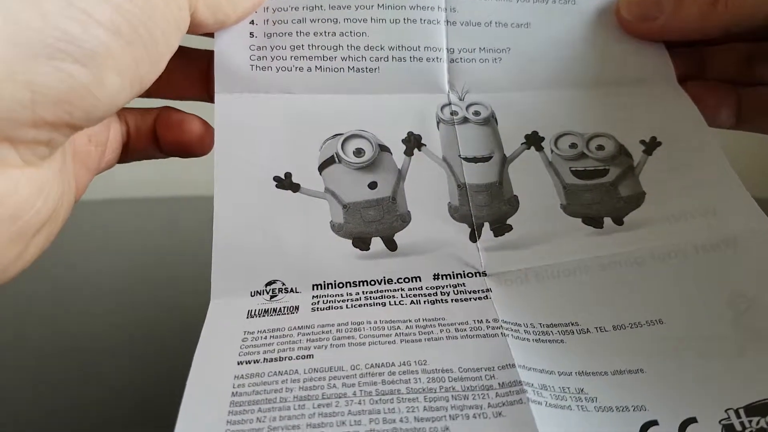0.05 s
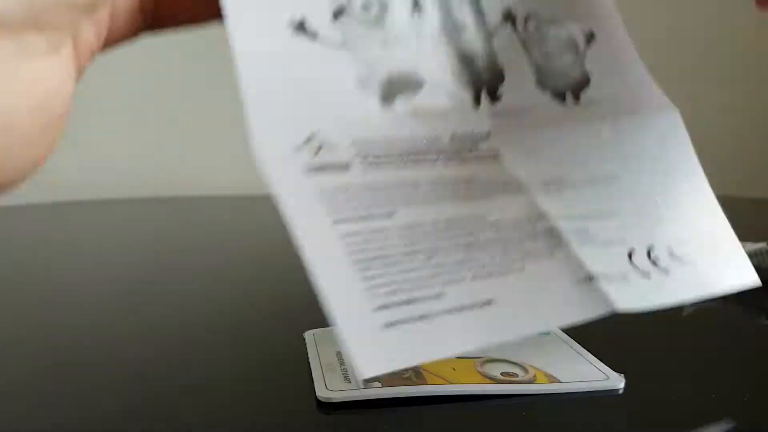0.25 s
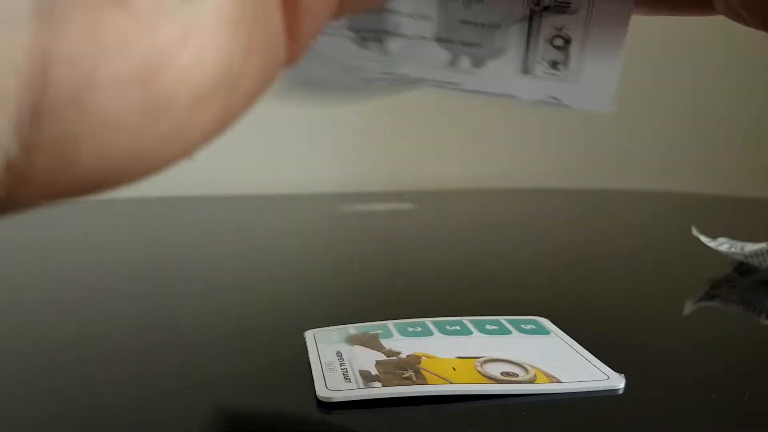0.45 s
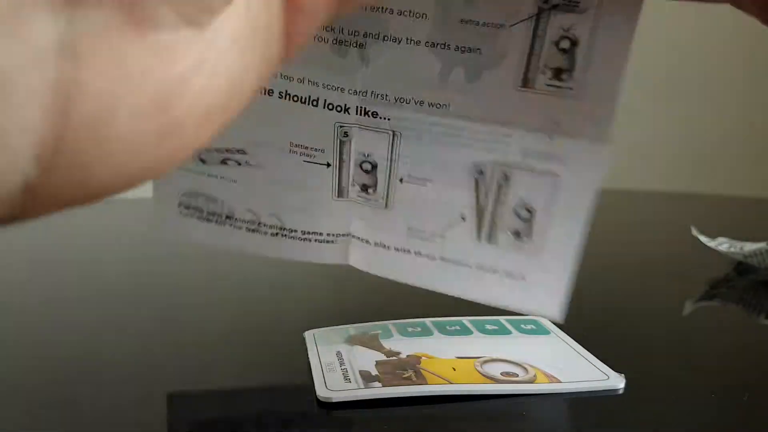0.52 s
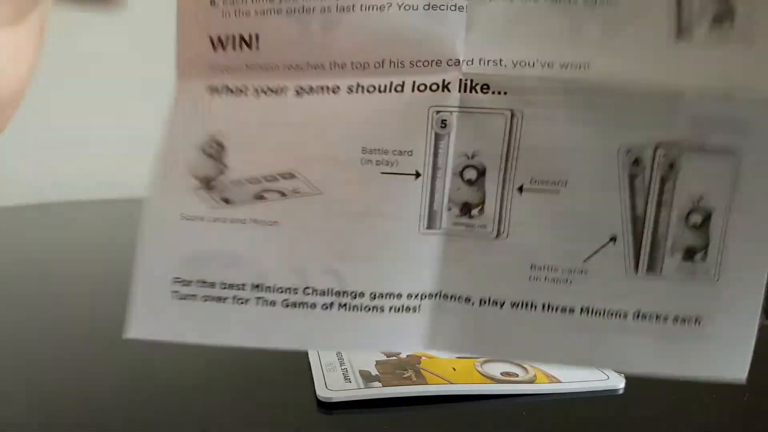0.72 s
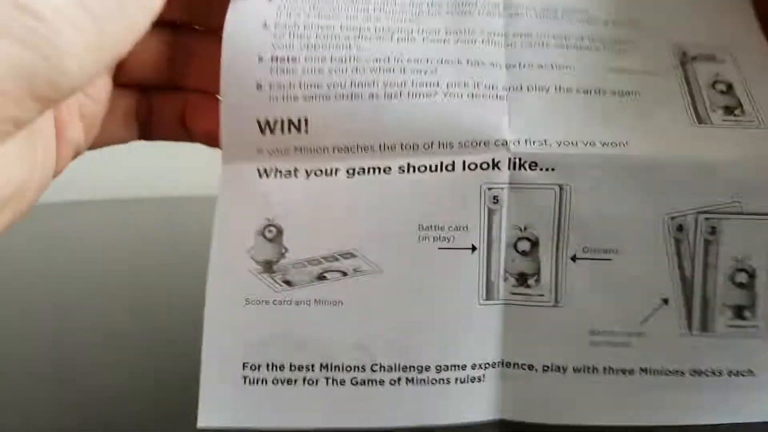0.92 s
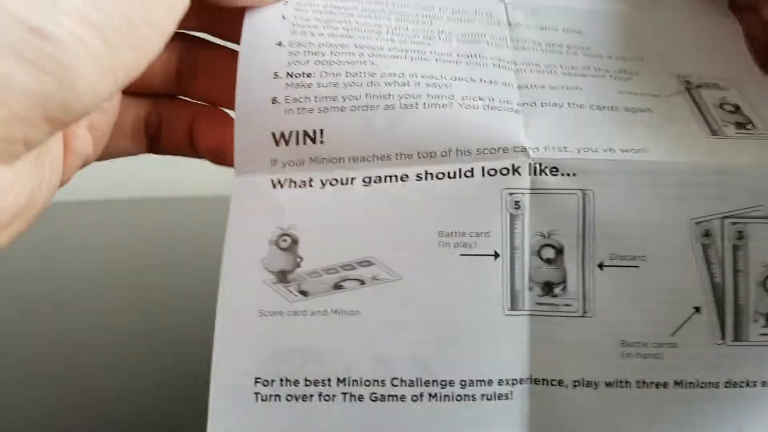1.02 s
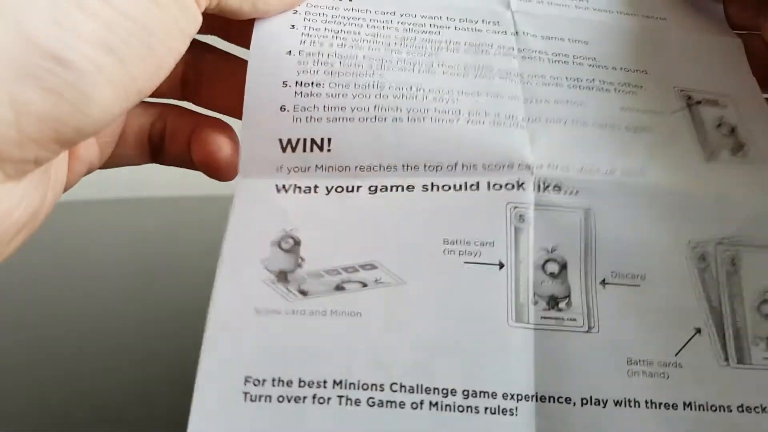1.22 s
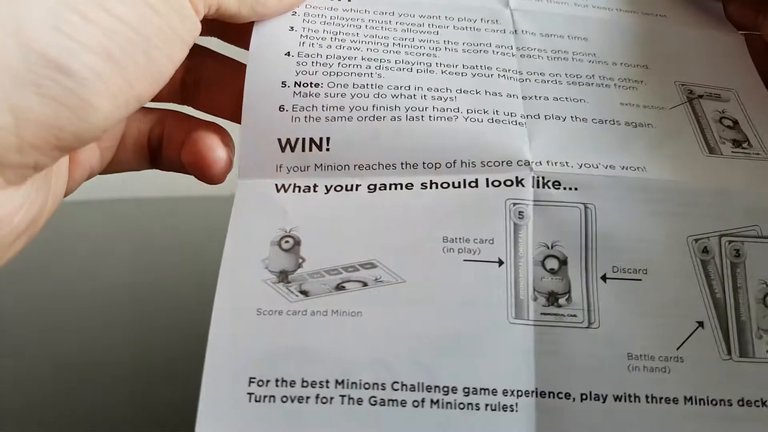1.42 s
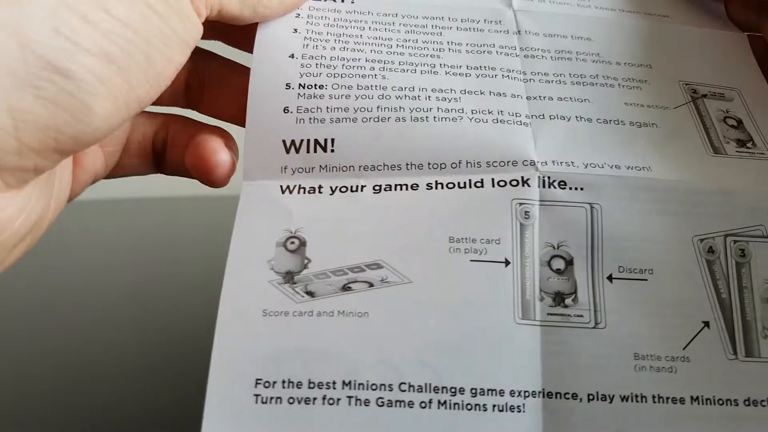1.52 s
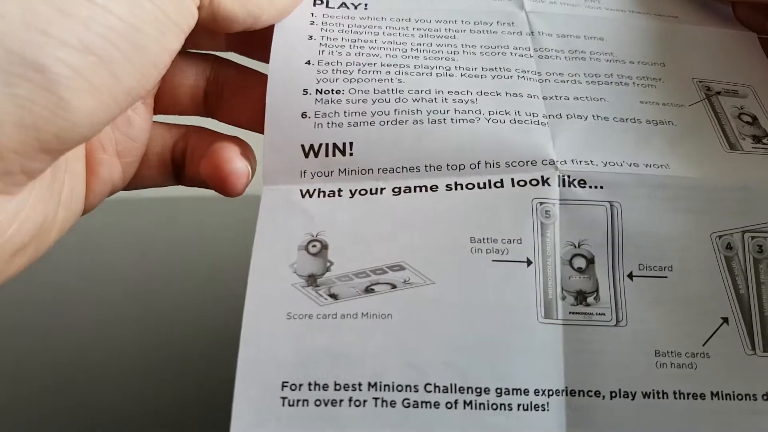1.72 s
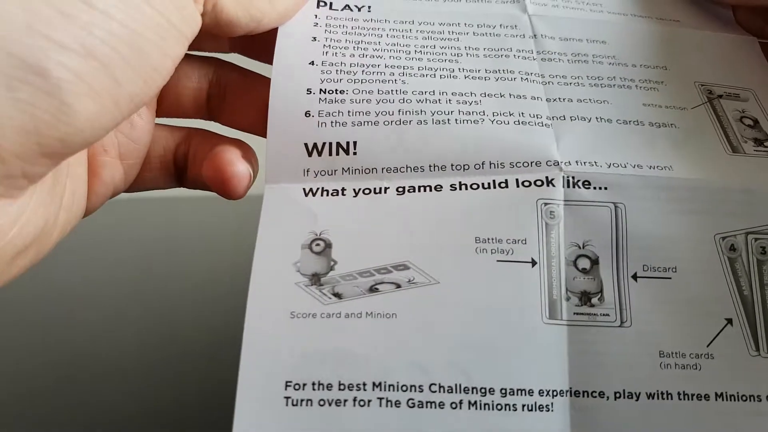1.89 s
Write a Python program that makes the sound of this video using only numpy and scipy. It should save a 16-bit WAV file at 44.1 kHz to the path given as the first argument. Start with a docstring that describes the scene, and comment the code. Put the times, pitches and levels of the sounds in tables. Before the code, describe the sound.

A paper leaflet crackles and rustles as hands flip and unfold it in a quiet room.

```python
"""Paper leaflet flipped by hand

A folded leaflet is flipped and opened just in front of a small two-port microphone.
Patches buckle with dull pops (pulses into a resonance), creases crack brightly (gritty noise bursts),
a fine rustle (random grains and ticks) runs while the sheet moves.
Table top and small quiet room answer with echoes and a diffuse tail over steady room tone and hiss."""
import sys
import numpy as np
from scipy import signal
from scipy.fft import rfft, irfft
from scipy.io import wavfile
from scipy.ndimage import uniform_filter1d

SR = 44100
rng = np.random.default_rng(int(sys.argv[2]) if len(sys.argv) > 2 else 0)


def inscribe(sig):
    """Save sig as 16-bit PCM at rate SR to the path in sys.argv[1].

    A 1-D sig is mono; a 2-D sig holds one channel per row.
    Samples are clipped to [-1, 1] before scaling.
    """
    pcm = np.round(np.clip(np.atleast_2d(sig).T, -1, 1) * 32767)
    wavfile.write(sys.argv[1], SR, pcm.astype(np.int16))


N = 85995

# spectrum of paper hiss, in ticks and cracks: f/Hz, level/dB
HISS_COLOUR = [(250, -26), (900, 6.5), (2500, 5.5), (8000, -9), (9300, -24), (13000, -16)]
# buckles: onset t/s, peak level/dB before the thud, patch pitch f/Hz, decay/ms
POPS = [(0.198, -46, 1480, 2.4), (0.24, -27, 705, 2.7), (0.2518, -22, 623, 2.3), (0.263, -29, 1037, 7.1),
        (0.43, -11, 1200, 5.7), (0.463, -21.5, 1270, 2), (0.504, -31, 690, 27), (0.514, -21.5, 690, 4.5),
        (0.527, -24, 317, 14), (0.598, -19.5, 756, 7.8), (0.634, -28, 1060, 14), (0.654, -28.5, 237, 10),
        (0.684, -23.5, 380, 5.5), (0.703, -25.5, 745, 9.9), (0.72, -28.5, 1200, 7), (0.759, -24, 1130, 8.7),
        (0.774, -21.5, 337, 1.5), (0.9035, -23.5, 600, 13.7), (0.9335, -18.5, 1010, 13),
        (0.95, -13.5, 677, 2.95), (1.033, -29.5, 1000, 5.7), (1.0615, -26.5, 606, 1.8),
        (1.086, -25, 620, 5.9), (1.101, -21.5, 990, 4.2), (1.116, -26.5, 1030, 5.9),
        (1.158, -31.5, 516, 10.7), (1.2497, -19.5, 595, 5), (1.295, -28.5, 1060, 9.1),
        (1.3135, -17.5, 1070, 3.3), (1.3975, -23, 1070, 0.86), (1.4857, -37, 920, 2.8),
        (1.557, -38.5, 720, 3), (1.567, -39.5, 620, 1.1), (1.619, -37, 656, 2.8), (1.642, -30.5, 1070, 2.2),
        (1.7965, -36.5, 290, 3.5), (1.8125, -38, 653, 3.6), (1.854, -43, 592, 1.2)]
# creases: peak t/s, peak level/dB of the ringing part, centre f/Hz, fizz/dB re ringing part, decay/ms
CRACKS = [(.235, -34.5, 3000, -9, 1.6), (.242, -41, 5560, 8.5, 0.73), (.4302, -26.5, 3400, -35, 3.5),
          (.467, -28, 3400, 1.5, 8.9), (.473, -25.5, 3640, 3.5, 1.8), (.528, -21, 7000, -8.5, 1.4),
          (.601, -44, 4670, -22, 2.7), (.704, -34, 3320, -0.5, 5.2), (.759, -27, 6600, -8, 1.2),
          (.9102, -17.5, 4310, -12, 0.71), (.952, -29, 5340, 0, 3.9), (1.298, -40.5, 2730, -28, 11),
          (1.317, -28.5, 2500, -16, 3.7), (1.559, -51, 3000, 1.5, 1.9), (1.621, -61.5, 4000, 8.5, 1.2),
          (1.799, -56.5, 5170, 5.5, 2.5)]
PULSE_SIGMA_MS = 0.11  # rustle grain, or buckle of a 1 kHz patch
PORT_LAG_MS, CRACK_PORT_LAG_MS = .07, .19  # right port after left
CRACK_LEAD_MS = 10


def amp(db):
    """dB to amplitude factor."""
    return 10 ** (np.asarray(db) / 20)


def even(x):
    """Scales to unit RMS."""
    return x / np.sqrt(np.mean(x ** 2) + 1e-20)


def peaked(x):
    """Scales to unit peak."""
    return x / (abs(x).max() + 1e-20)


def read(points, hz):
    """Interpolates (f/Hz, value) points over log frequency."""
    f, v = np.transpose(points)
    return np.interp(np.log(hz + 1), np.log(f + 1), v)


def colour(x, points, lag_ms=0):
    """Filters by a dB spectrum and delays."""
    hz = np.fft.rfftfreq(x.shape[-1], 1 / SR)
    delay = np.exp(-2j * np.pi * hz * lag_ms / 1000)
    return irfft(rfft(x) * amp(read(points, hz)) * delay, x.shape[-1])


def ring(x, hz, width_hz):
    """Two-pole resonance of gain 1."""
    return signal.lfilter(*signal.iirpeak(hz, hz / width_hz, SR), x)


def pair(two):
    """Blends two unrelated signals so that the ports share the bass, as in diffuse sound."""
    # left-right likeness of diffuse sound: f/Hz, correlation (0..1)
    likeness = [(500, 0.87), (1200, 0.09), (3000, 0.029)]
    z, hz = rfft(two), np.fft.rfftfreq(two.shape[1], 1 / SR)
    c = np.clip(read(likeness, hz), 0, 1)
    right = c * z[0] + np.sqrt(1 - c ** 2) * z[1]
    return irfft([z[0], right], two.shape[1])


def flex(clicks, sigma_ms):
    """Clicks become soft pushes on the air: Gaussian smoothing, then a high-pass."""
    u = np.arange(-40, 41) / SR * 1000 / sigma_ms
    pushes = np.convolve(clicks, np.exp(-u ** 2 / 2), "same")
    return signal.lfilter([1, -1], [1, -.95], pushes)


def air():
    """Steady room tone and microphone hiss: coloured noise, bass common to both ports."""
    # background spectrum: f/Hz, relative density/dB per Hz
    spectrum = [(50, -1.5), (400, -0.5), (1500, -11.5), (8000, -23.5), (15000, -15)]
    level_db = -68.5
    return amp(level_db) * even(colour(pair(rng.standard_normal((2, N))), spectrum))


def rustle():
    """Countless tiny buckles ring the sheet's modes; fibre ticks add treble while the sheet moves."""
    # movement of the sheet: t/s, grain level/dB, tick level/dB
    course = [(0.189, -100, -78), (0.228, -51.5, -55.5), (.26, -55.5, -47.5), (0.338, -53.5, -62.5),
              (0.421, -70.5, -70), (0.436, -33.5, -39.5), (0.551, -37.5, -40), (.69, -50, -42),
              (.75, -41, -40), (.8, -64.5, -49), (.895, -55.5, -59.5), (0.958, -57, -42.5),
              (1.12, -50.5, -64), (1.237, -66, -67.5), (1.308, -50, -49.5), (1.45, -69.5, -72),
              (1.66, -72.5, -67.5), (1.75, -60.5, -64), (1.899, -82, -73.5)]
    # sheet modes: f/Hz, width/Hz, level/dB
    modes = [(264, 29, 8), (578, 214, -2), (1060, 73, 0.5), (2130, 260, -14)]
    # mode detuning from spot to spot: frequency factor
    bends = [0.895, 1, 1.11]
    grains_per_s, grain_spread_db, flutter_rms_db = 1600, 2, 6.5
    s, grain_db, tick_db = np.transpose(course)
    t = np.arange(N) / SR

    size = amp(grain_spread_db * np.minimum(rng.exponential(1, N), 4))
    size *= rng.random(N) < grains_per_s / SR
    clumps = even(uniform_filter1d(rng.standard_normal(N), size=500))
    size *= amp(flutter_rms_db * clumps)

    spot = rng.integers(len(bends), size=N)
    signed = size * rng.choice([-1, 1], N)
    sheet = 0
    for j, bend in enumerate(bends):
        push = flex(signed * (spot == j), PULSE_SIGMA_MS)
        for k, (hz, width_hz, db) in enumerate(modes):
            sheet += (-1) ** k * amp(db) * ring(push, hz * bend, width_hz)  # alternating polarity
    grains = even(sheet) * amp(np.interp(t, s, grain_db))
    grains = np.array([grains, colour(grains, [(1, 0.014)], PORT_LAG_MS)])

    density = uniform_filter1d(size, size=30) / size.mean()
    ticks = (1 + 0.97 * density) * pair(rng.standard_normal((2, N)))
    return grains + even(colour(ticks, HISS_COLOUR)) * amp(np.interp(t, s, tick_db))


def pop(db, hz, ms, a, b):
    """One buckle of a patch and a short run of slips around it; longer buckles ring more."""
    build_ms, slips_per_ms, slip_db = 1.45, 1.3, -1.5
    size_law = 0.47  # larger patches push more slowly
    width_share, patch_db = .19, -11  # width re pitch; ring level re push of a 1 ms buckle
    thud_db, thud_hz = -35, 86
    t = np.arange(len(a)) / SR * 1000 - build_ms
    fade = np.exp(np.where(t > 0, -t / max(ms, .5), 3 * t / build_ms))
    clicks = amp(slip_db) * fade * a * (b < slips_per_ms * 1000 / SR)
    clicks[np.argmax(t > 0)] = 1  # the buckle itself
    push = flex(clicks, PULSE_SIGMA_MS * (1000 / hz) ** size_law)
    patch = peaked(ring(push, hz, hz * width_share)) * abs(push).max()
    body = push + amp(patch_db) * np.sqrt(abs(ms)) * patch
    thud = ring(ring(abs(clicks), thud_hz, thud_hz), thud_hz, thud_hz)
    return amp(db) * (peaked(body) + amp(thud_db) * peaked(thud))


def crack(db, hz, fizz_db, ms, a, b):
    """A gritty burst as the fibres of a crease give: ringing, broad and fizz parts of one noise."""
    # fizz spectrum, near white: f/Hz, level/dB
    fizz_colour = [(8500, -20), (12000, -17)]
    broad_db, broad_db_per_fizz_db, grit = 9, .35, 3.36
    t = np.arange(len(a)) / SR * 1000 - CRACK_LEAD_MS
    swell = np.exp(-abs(t / max(ms, .3)) * (1 + (t < 0)))  # rises twice as fast as it falls
    burst = a * swell * (1 + grit * (b < .06))
    ringing = peaked(ring(burst, hz, hz / 4))
    broad = amp(broad_db + broad_db_per_fizz_db * fizz_db) * peaked(colour(burst, HISS_COLOUR))
    fizz = amp(fizz_db) * peaked(colour(burst, fizz_colour))
    return amp(db) * (ringing + broad + fizz)


def placed(rows, make, lead_ms=0, lag_ms=PORT_LAG_MS, size=2600):
    """Each event reaches the two ports from its own spot: level tilt and a random lag."""
    # where the sheet is: t/s, left minus right level/dB
    sideways = [(.38, 0), (.44, -3.5), (.5, 0)]
    lag_spread_ms = .06
    out = np.zeros((2, N + size))
    for s, *row in rows:
        x = make(*row, rng.standard_normal(size), rng.random(size))
        at = round((s - lead_ms / 1000) * SR)
        tilt = amp(np.interp(s, *np.transpose(sideways)) / 2)
        event_lag_ms = lag_ms + lag_spread_ms * rng.standard_normal()
        out[0, at:at + size] += x * tilt
        out[1, at:at + size] += colour(x, [(1, 0)], event_lag_ms) / tilt
    return out[:, :N]


def room(x):
    """Near echoes off table and hands, then a diffuse tail cycling through three patterns at 9 Hz."""
    # decay: f/Hz, t60/s
    decay = [(150, 0.52), (1040, 0.2), (7280, 0.2)]
    # near echoes: delay/ms, level/dB
    echoes = [(1.9, -10), (8.5, -18.5)]
    tail_db, turn_hz = -10.5, 9
    out, turn = 0, 2 * np.pi * turn_hz * np.arange(N) / SR
    for k in range(3):
        taps = rng.choice([-1., 1.], (2, SR // 2)) * (rng.random((2, SR // 2)) < .05)
        taps[:, :250] = 0  # silent before the first reflections
        hz, t, z = signal.stft(pair(taps), SR, nperseg=256)
        fading = z * amp(-60 * t / read(decay, hz)[:, None])
        tail = signal.istft(fading, SR, nperseg=256)[1]
        tail *= amp(tail_db) / np.linalg.norm(tail[0])
        feed = x[0] * np.sqrt(2 / 3) * np.cos(turn + k * np.pi / 3)
        out += signal.fftconvolve([feed], tail, axes=1)[:, :N]
    near = np.zeros((2, 1000))
    for ms, db in echoes:
        at = (ms * SR / 1000 + rng.integers(-9, 9, size=2)).astype(int)  # differs per port
        near[[0, 1], at] += amp(db)
    return out + signal.fftconvolve([x[0]], near, axes=1)[:, :N]


def scene():
    """Sums the paper sounds, their room answer and the background."""
    paper = placed(POPS, pop) + placed(CRACKS, crack, CRACK_LEAD_MS, CRACK_PORT_LAG_MS) + rustle()
    return paper + room(paper) + air()


def record(dry):
    """Tone of the whole scene: deepest bass reduced, top treble cut steeply near 16 kHz; DC offset."""
    # overall spectrum: f/Hz, level/dB
    spectrum = [(25, -18), (60, 0), (15900, 0), (16200, -24)]
    offset, edge_hz = -0.00035, 16900
    low_pass = signal.firwin(511, edge_hz, window=("kaiser", 9), fs=SR)
    return signal.oaconvolve(colour(dry, spectrum) + offset, low_pass[None], "same")


dry = scene()
out = record(dry)
inscribe(out)
```